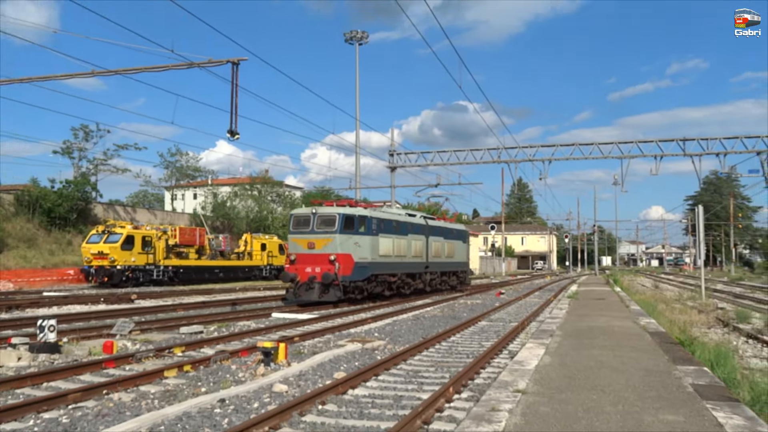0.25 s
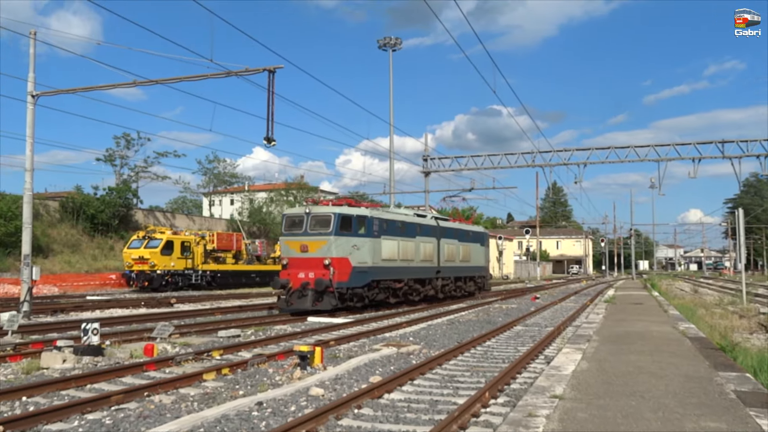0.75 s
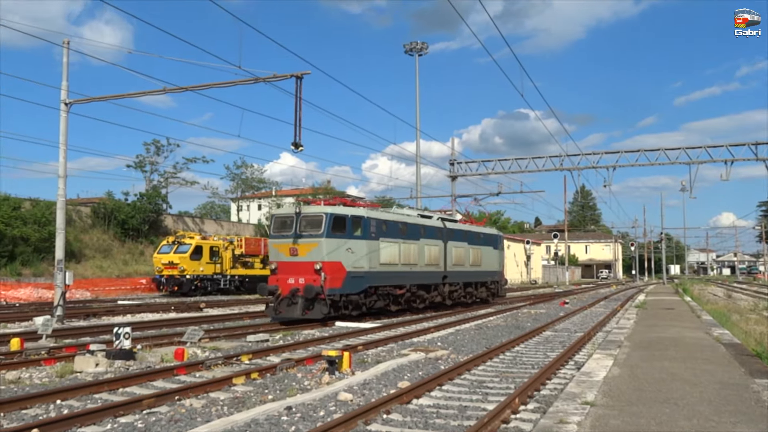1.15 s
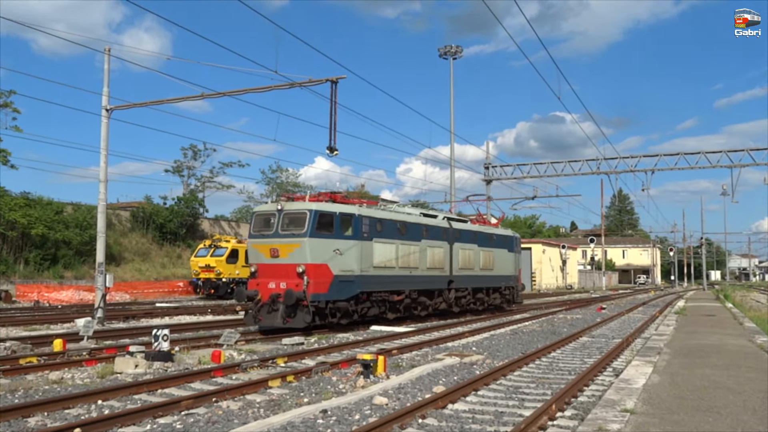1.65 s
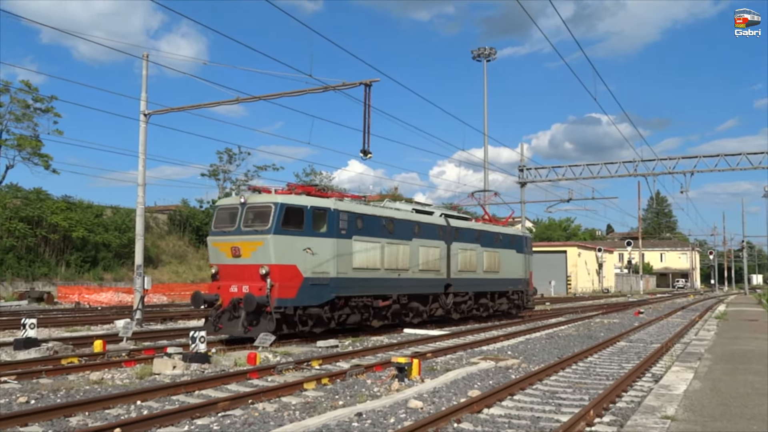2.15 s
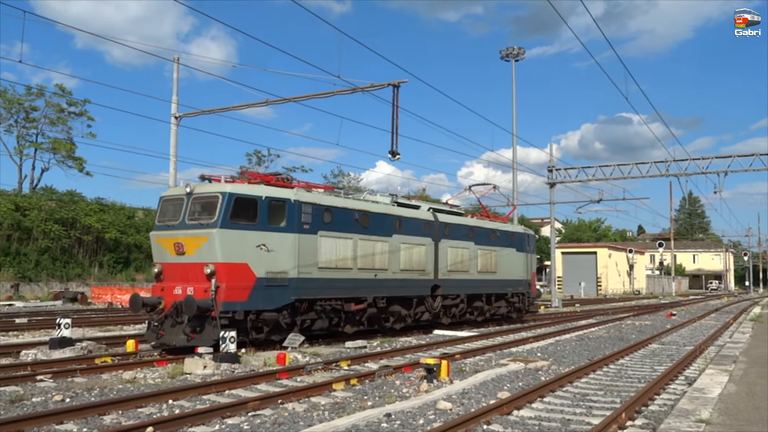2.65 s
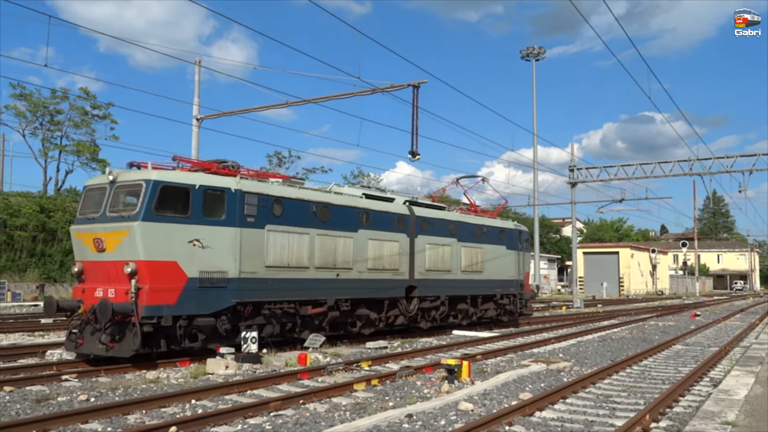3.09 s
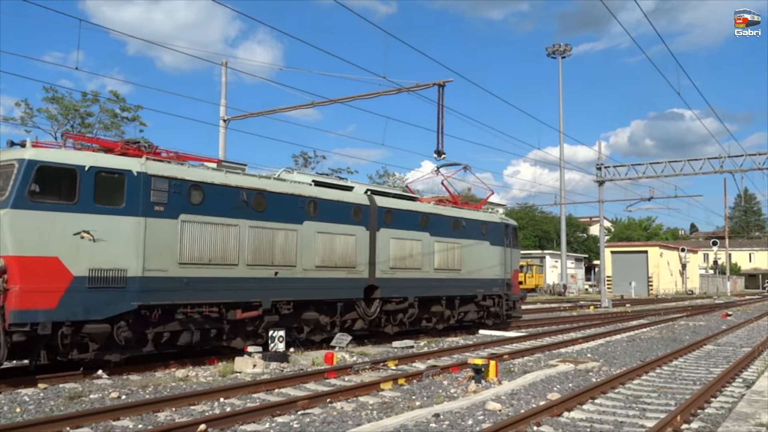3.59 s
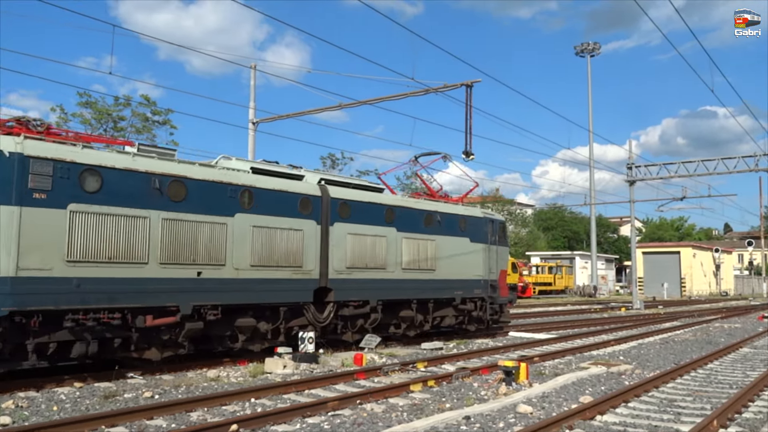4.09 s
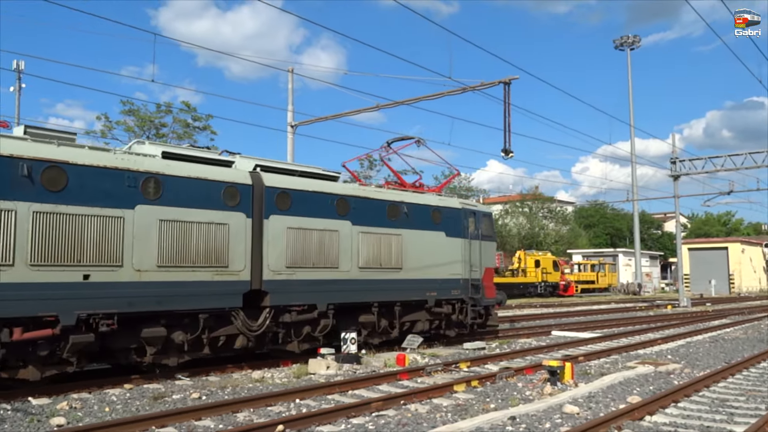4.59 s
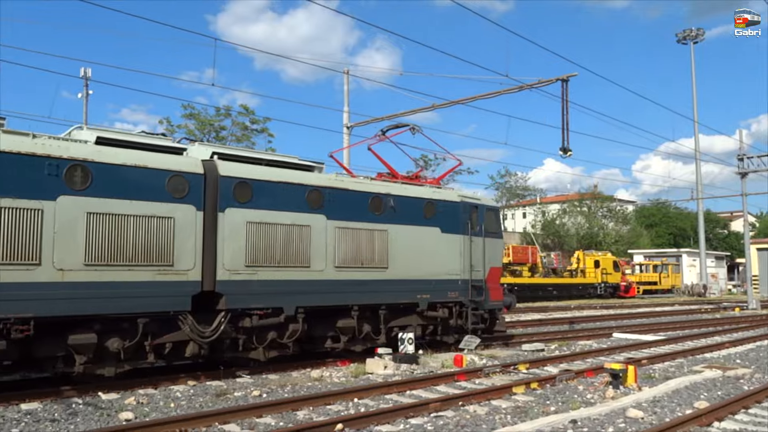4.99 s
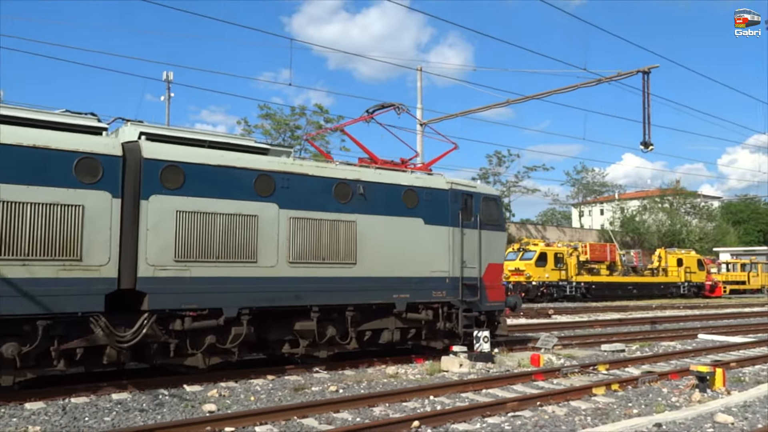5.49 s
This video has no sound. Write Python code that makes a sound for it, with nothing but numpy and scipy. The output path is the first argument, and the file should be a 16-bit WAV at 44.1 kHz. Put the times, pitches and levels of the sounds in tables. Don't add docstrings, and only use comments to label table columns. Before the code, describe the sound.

A harsh steel grind is present from the first instant as a slow electric locomotive rolls across yard points. Wheel flanges scrape the rails with dense bright hiss, and several high ringing notes waver and swell unevenly inside it, like a rough, unsteady squeal. Around 0.5-0.7 s the contact slips and the grind dips briefly, then returns. Near 1.1-1.2 s sharp cracks jump out. A midrange rolling roar grows, fullest at about 1.9-3.2 s, with dull rail-joint knocks clustered from 2.1 to 3.2 s and a lower whining rim note. From 3.2 s the trailing wheels take over: more sizzle, gritty squeaks and passing squeals. Around 4.0-4.4 s the grind drops suddenly and comes back with rapid crackling snaps. Squealing and scraping continue, uneven, to the cut at about 5.7 s. Outdoors, close and dry; a small platform camera microphone, thin in bass, slightly left.

```python
import sys
import numpy as np
from scipy import signal
from scipy.fft import rfft, irfft, next_fast_len
from scipy.io import wavfile
from scipy.ndimage import uniform_filter1d, minimum_filter1d, map_coordinates

SR = 44100
rng = np.random.default_rng(int(sys.argv[2]) if len(sys.argv) > 2 else 0)


def inscribe(sig):
    pcm = np.round(np.clip(np.atleast_2d(sig).T, -1, 1) * 32767)
    wavfile.write(sys.argv[1], SR, pcm.astype(np.int16))


def elevation(decibels):
    levels = np.asarray(decibels, float)
    return 10 ** (levels / 20)


N = 253134

# time_s, pressure_db, bite_db
FLANGE_GRIND = [(0, -23.5, -2.5), (.3, -24.5, -2), (.55, -23, -2), (.9, -21.5, -1.5), (1.9, -21.5, -0.5),
                (3.07, -21, 0), (3.2, -22, -2), (3.5, -22.5, -1.5), (3.75, -20, -9), (3.96, -19, -11.5),
                (4.1, -19.5, -3.5), (4.3, -19.5, -3), (4.52, -19, -7), (4.9, -20, -0.5), (5.05, -21, -3),
                (5.4, -22.5, -4), (5.55, -19, -7), (5.74, -19, -5)]
# centre_s, length_s, level_db
CONTACT_SLIPS = [(.5, 0.024, -2), (1.445, 0.0099, -0.5), (3.392, 0.019, -3), (3.61, 0.011, -1.5),
                 (4.048, 0.0063, -6), (5.47, 0.028, -2.5), (4.117, .008, -1), (4.272, 0.0033, -11),
                 (4.405, 0.0026, -1), (4.487, .004, -0.5), (4.647, 0.0038, -4)]
# start_s, end_s, drop_db, recovery_s
POINT_GAPS = [
    (0.548, 0.682, -4, 0.03),
    (.575, .692, -2.5, .006),
    (4.039, 4.135, -9, 0.0074),
    (4.116, 4.195, -5, 0.073),
]
# time_s, rear_share (0-1)
HANDOVER_TO_REAR = [
    (0, 0),
    (3.05, 0.28),
    (3.25, 0.84),
    (5.74, 0.79),
]
# pitch_hz, level_db (per Hz)
SCRAPE_COLOUR = [(1300, -60), (1600, -8.5), (2010, 0.5), (3300, -5), (4030, -5), (5000, -7), (6510, -1.5),
                 (7610, -1), (8480, -3.5), (10000, -10.5), (13400, -16.5), (15600, -23)]
ZONE_EDGES_HZ = [1650, 3050, 5300, 9300, 16500]
# level_db (over pressure), bite_share, gap_share, flutter_db
GRIND_ZONES = [
    (-5.5, 1, 1.2, 2),
    (-3.5, 0.64, 1.27, 0),
    (-0.93, .01, 1.24, 1.5),
    (-14, 0.17, 1.12, 2),
]
# pitch_hz, width_hz, level_db
FRONT_MODES = [(1952, 40, -7.5), (2320, 50, -8.5), (2537, 20, -2.5), (2706, 100, -10), (5880, 260, -5),
               (6460, 230, -4), (7900, 200, -9.5), (7790, 150, -7), (8430, 140, -5), (9800, 220, -17),
               (10450, 220, -11), (11300, 160, -15), (11900, 300, -26), (12900, 210, -26)]
# pitch_hz, width_hz, depth (0-1)
FRONT_NULLS = [(1586, 360, 0.95), (3030, 150, 0.87), (3660, 210, 0.83), (4490, 290, 0.85), (6120, 215, 0.9),
               (7500, 94, 0), (8710, 300, 0.47), (10000, 250, 0.56), (11900, 200, 0.3), (12200, 250, 0.1),
               (13400, 250, 0.4)]
# pitch_hz, width_hz, level_db
REAR_MODES = [(1828, 62, -4.5), (2400, 83, -5.5), (6440, 110, -2.5), (7110, 150, -1), (8640, 83, -4.5),
              (8150, 350, -5), (10600, 150, -7.5), (11300, 150, -20), (11900, 150, -13), (13150, 200, -17)]
# pitch_hz, width_hz, depth (0-1)
REAR_GAPS = [(3205, 440, 0.81), (3670, 230, 0.65), (4830, 62, 0.6), (10560, 360, 0.6)]
# pitch_hz, width_hz, level_db
WHEEL_NOTES = [
    (3273, 78.1, 0.5),
    (4012, 124, 1),
    (4760, 110.2, -2),
]
# level_db (over pressure), bite_share, gap_share
NOTES_AT_REST = [
    (-12, 0.58, 0.35),
    (-16.5, 0.8, 1),
    (-16.5, .5, 0.67),
]
# centre_s, length_s, level_db
LOW_SWELLS = [(0.047, 0.044, 12), (0.282, 0.056, 9), (.4, 0.044, 4), (0.497, 0.1, 7.5), (.575, 0.018, 3.5),
              (.6, .012, 3), (.63, 0.012, -5), (.68, .012, 4), (0.895, 0.14, 6), (1.039, 0.037, 9),
              (1.525, 0.059, 6), (1.85, 0.086, 3.5), (2.082, .05, 5), (2.25, 0.051, 10),
              (2.602, 0.024, 12.5), (2.7, .03, 1), (2.77, 0.045, 7.5), (2.99, 0.06, 10.5), (3.244, .06, -8),
              (3.36, 0.029, 6), (3.6, 0.043, 0), (3.762, 0.038, 10.5), (3.87, 0.065, 11.5),
              (3.998, 0.03, 11.5), (4.062, .015, 3), (4.1, 0.037, 5.5), (4.14, .012, 1), (4.4, 0.029, 8),
              (4.62, 0.24, -7), (4.82, .025, 6), (4.97, .04, 5), (5.167, 0.08, 6), (5.29, .02, 5),
              (5.42, 0.082, 11), (5.62, .08, -2)]
MIDDLE_SWELLS = [(.1, 0.051, 8.7), (.34, 0.22, 8.5), (4.92, .015, 5), (1.0, .03, 6.1), (1.13, .05, 11),
                 (1.22, 0.063, 9.6), (1.36, .06, 11.5), (1.7, 0.082, 5.4), (2.21, 0.037, 5),
                 (2.57, 0.043, 4.7), (2.87, 0.048, 4.6), (3.06, .046, 4), (3.66, .03, 5), (3.99, 0.11, 7.3),
                 (4.27, 0.041, 7), (4.68, .03, 7), (4.77, .03, 5), (4.85, 0.053, 7.4), (5.0, .04, 6.6),
                 (5.17, 0.06, 7.7), (5.38, 0.15, 9.1), (5.7, .03, 4)]
HIGH_SWELLS = [(.1, 0.061, 8.3), (.46, 0.04, 17), (1.11, 0.12, 8.2), (1.93, .1, 5.4), (2.67, .1, 4.6),
               (3.09, .08, 4.8), (5.18, 0.065, 5), (5.55, 0.047, 9.4), (5.7, .04, 6)]
# centre_s, length_s, level_db
RIM_NOTE_SWELLS = [(1.28, .05, 11), (1.42, .05, 8), (1.7, .08, 10), (1.98, .03, 13), (2.07, .03, 14),
                   (2.17, .04, 11), (2.4, .08, 9), (2.55, .06, 10), (2.75, 0.083, 12), (2.87, .04, 13),
                   (3.3, .04, 14), (4.33, .03, 10), (4.5, .05, 7), (4.9, .05, 9), (5.31, .02, 11)]
# time_s, level_db
ROLLING_LEVEL = [(0, -41), (.35, -42), (.68, -40.5), (.73, -37.5), (1.6, -36.5), (1.9, -33.5), (2.45, -32),
                 (2.65, -31.5), (3.15, -32.5), (3.27, -37), (4.25, -36), (4.4, -41.5), (4.95, -37.5),
                 (5.1, -39.5), (5.74, -39)]
# pitch_hz, level_db (per Hz)
RAIL_COLOUR = [(12, -69), (20, -40), (86, -20), (135, -26), (241, -7), (399, -10), (464, -14), (500, -7.5),
               (570, -11.5), (687, 2.5), (798, 5), (1040, -4), (1250, 3), (1510, -4.5), (1750, 2),
               (2280, -33), (3850, -120)]
ROLLING_EDGES_HZ = [1650, 600, 150, 10]
# level_db (over rolling level), swing_share, rough_share, dipped_share
ROLLING_ZONES = [
    (-0.88, 0.91, 0.51, 0.074),
    (-12, 0.87, 0.15, 0.67),
    (-31.5, 0.64, .1, 0.16),
]
# centre_s, length_s, level_db
ROUGH_STRETCHES = [(0.74, 0.039, 13), (1.1, 0.05, 5), (1.73, 0.026, 7), (1.94, 0.055, 11),
                   (2.38, 0.13, 7.5), (2.72, 0.026, 6.5), (2.92, 0.069, 10.5), (3.18, 0.042, 8),
                   (3.89, 0.019, 1), (4.09, .05, -2), (4.24, 0.08, 2.5), (4.81, 0.15, 7), (5.73, 0.029, 3)]
# centre_s, length_s, level_db
DIPPED_STRETCHES = [(0.17, 0.091, 8), (0.62, 0.097, 9.5), (1.14, 0.091, 6), (2.15, 0.059, 2),
                    (2.4, 0.094, 6.5), (2.54, 0.034, 3), (2.71, 0.039, 9.5), (2.89, 0.042, 7),
                    (3.91, 0.041, 8.0), (4.07, 0.24, 10), (4.84, 0.082, 7.5), (5.2, 0.02, 8),
                    (5.36, 0.14, 8.5)]
# centre_s, pitch_hz, length_s, level_db
BRIEF_PINGS = [(0.033, 3990, 0.022, -26), (0.152, 5660, 0.013, -25), (0.273, 3220, 0.026, -27),
               (0.55, 6570, 0.012, -26), (0.894, 5480, 0.015, -31), (1.054, 2730, 0.012, -30),
               (1.28, 7900, 0.03, -25), (1.416, 7380, 0.012, -23), (1.849, 6630, 0.015, -27),
               (1.958, 2270, 0.01, -29), (2.024, 2560, 0.016, -23), (2.073, 1930, 0.022, -24),
               (2.109, 7380, 0.028, -31), (2.154, 2960, 0.012, -27), (2.422, 8810, 0.013, -30),
               (2.492, 2270, 0.019, -27), (2.663, 5080, 0.016, -29), (2.741, 7730, 0.03, -25),
               (2.79, 1980, 0.017, -26), (3.143, 8350, 0.015, -30), (3.175, 9330, 0.012, -34),
               (3.175, 2550, 0.015, -28), (3.213, 8240, 0.015, -29), (3.262, 8410, 0.012, -28),
               (3.274, 5540, 0.012, -29), (3.288, 1920, 0.013, -28), (3.325, 4450, 0.013, -29),
               (3.43, 7030, 0.012, -26), (3.487, 8810, 0.01, -23), (3.69, 3270, 0.02, -29),
               (3.811, 8300, 0.012, -23), (3.83, 6570, 0.013, -20), (3.911, 8000, 0.013, -26),
               (3.913, 7210, 0.012, -25), (4.188, 7840, 0.012, -28), (4.544, 1920, 0.016, -31),
               (4.547, 7030, 0.013, -26), (4.925, 3880, 0.012, -25), (4.986, 7840, 0.023, -25),
               (5.042, 5250, 0.012, -29), (5.132, 4160, 0.012, -27), (5.148, 6460, 0.016, -27),
               (5.177, 3760, 0.013, -27), (5.281, 6520, 0.028, -26), (5.341, 4220, 0.012, -31),
               (5.462, 6520, 0.012, -29), (5.538, 4220, 0.012, -26), (5.706, 3250, 0.023, -28)]
# start_s, peak_db, fade_s (to -60 dB), pitch_hz
BITE_CRACKS = [(.4924, -15, .004, 5000), (1.135, -8, .008, 4000), (1.201, 9, 0.0072, 4000),
               (4.126, -4, 0.0092, 8000), (4.143, -8, .004, 8000), (4.154, 1, .005, 5500),
               (4.195, -3, 0.008, 7500), (4.217, -4, 0.012, 9000), (4.274, -14, .01, 7500),
               (4.32, -8, .012, 10000), (4.364, -12, .006, 7900)]
# start_s, peak_db, pitch_hz
RAIL_JOINTS = [(0.601, -34, 296), (1.141, -31.5, 399), (2.149, -26, 410), (2.36, -20, 1654),
               (2.698, -27, 735), (2.898, -21, 975), (2.905, -36, 1230), (3.174, -17, 1282),
               (3.875, -23.5, 740), (4.059, -27.5, 316), (4.24, -21.5, 762)]
# centre_s, pitch_hz, width_hz, length_s, level_db
PASSING_SQUEALS = [(3.512, 1910, 86, 0.036, -24.5), (1.44, 6680, 259.2, 0.092, -22.5),
                   (1.82, 5400, 79.92, .12, -27), (2.03, 2002, 31, 0.1, -27.5), (2.497, 1950, 65, 0.1, -31),
                   (3.14, 1878, 44.28, 0.1, -27.5), (3.425, 2050, 81, 0.036, -26.5),
                   (2.516, 768, 86.4, 0.078, -32.5), (4.86, 4755, 36, .16, -22.5),
                   (3.282, 5290, 55.56, .025, -29), (3.165, 10600, 80, .03, -31),
                   (3.28, 6930, 160, 0.11, -25), (3.55, 7150, 200, 0.1, -24),
                   (3.486, 8300, 280.8, .08, -20.5), (3.882, 6630, 108, .12, -24),
                   (4.022, 7960, 670, 0.019, -9), (4.135, 8650, 360, 0.0077, -20),
                   (4.225, 5780, 453.7, 0.015, -20), (4.252, 4000, 28.08, 0.022, -20.5),
                   (4.287, 8140, 750, 0.0063, -12), (4.505, 2410, 52, 0.011, -17),
                   (5.1, 7800, 50, 0.17, -31.5), (5.3, 9800, 130, 0.3, -31), (5.64, 7090, 460, 0.16, -25)]
# pitch_hz, in_step (signed share, -1 to 1),
# in_quadrature (signed share, -1 to 1), unlike_db
SIDE_EARLY = [(30, 0, 0, -20), (55, .01, -.01, -40), (100, 0, -.01, -34), (160, .01, -.04, -21),
              (300, .03, -.09, -20), (600, .05, -.17, -23), (1300, .22, -.13, -15), (1900, .3, -.1, -17),
              (2500, 0, -.04, -20), (3500, .1, -.08, -14), (4200, .03, -.03, -20), (5250, .18, -.07, -17),
              (6200, .01, -.01, -22), (8500, .02, 0, -22), (9900, .02, .04, -10), (11300, .03, 0, -18),
              (12500, 0, 0, -40)]
SIDE_LATE = [(30, 0, 0, -20), (55, .01, -.01, -40), (100, 0, -.01, -34), (160, .01, -.04, -21),
             (600, .04, -.16, -22), (1200, .12, -.15, -17), (1750, .38, -.11, -14), (2300, .18, -.05, -14),
             (3500, .15, -.1, -13), (4000, .08, -.03, -20), (6700, .14, -.02, -19), (7800, .05, .01, -23),
             (9300, .08, .08, -15), (10500, .45, .08, -9), (11500, .35, -.02, -9), (12400, .14, -.02, -9),
             (14500, .03, 0, -16)]


def unit(x):
    return x / np.sqrt(np.mean(x ** 2) + 1e-20)


def along(points, hz):
    f, value = np.transpose(points)
    return np.interp(np.log(hz + 1), np.log(f + 1), value)


def curves(rows):
    time_s, *columns = np.transpose(rows)
    return [np.interp(np.arange(N) / SR, time_s, column) for column in columns]


def wobble(rate):
    knots = rng.standard_normal(int(N * rate / SR) + 4)
    return map_coordinates(knots, [np.arange(N) * rate / SR])


def filtered(x, response):
    m = next_fast_len(N + 8192)
    gain = response(np.arange(0, SR / 2 + 5, 5))
    nearest = np.round(np.fft.rfftfreq(m, 5 / SR)).astype(int)
    return irfft(rfft(x, m) * gain[..., nearest], m)[..., :N]


def mode(f, hz, width):
    return 1j * f * width / (hz * hz - f * f + 1j * f * width + 1e-9)


def band(f, lo, hi):
    return 1 / np.sqrt((1 + (lo / (f + 1)) ** 40) * (1 + (f / hi) ** 40))


def rubbing(patchy_db, streaky_db):
    z = signal.stft(rng.standard_normal((2, N + 512)), nperseg=512)[2]

    def field(bins, hops):
        rough = uniform_filter1d(rng.standard_normal(z.shape[1:]), bins, axis=0)
        return unit(uniform_filter1d(rough, hops, axis=1))

    gain = elevation(patchy_db * field(8, 5) + streaky_db * field(2, 14))
    return signal.istft(z * gain, nperseg=512)[1][:, :N]


def bump(s, length):
    bell = np.zeros(N)
    first, last = int((s - 4 * length) * SR), int((s + 4 * length) * SR)
    near = np.arange(max(first, 0), min(last, N))
    bell[near] = np.exp(-((near / SR - s) / length) ** 2)
    return bell


def swells(rows):
    return sum(db * bump(s, length) for s, length, db in rows)


def load(over_db, bite_share, gap_share):
    t = np.arange(N) / SR
    pressure_db, bite_db = curves(FLANGE_GRIND)
    gaps_db = 0
    for start, end, db, recovery in POINT_GAPS:
        unloading = np.clip((t - start) / 0.04, 0, 1)
        gaps_db = gaps_db + db * unloading * np.exp(-np.maximum(t - end, 0) / recovery)
    return pressure_db + over_db + bite_share * bite_db + gap_share * gaps_db


def rear_share():
    return np.clip(curves(HANDOVER_TO_REAR)[0], 0, 1)


def contact():
    return elevation(swells(CONTACT_SLIPS) + 0.36 * wobble(14) + 0.37 * wobble(90))


def wheels(modes, nulls, lift_db, streaky_db):
    def colour(f):
        peaks = sum(abs(mode(f, hz, width)) ** 2 * elevation(2 * (db + lift_db - along(SCRAPE_COLOUR, hz)))
                    for hz, width, db in modes)
        gaps = np.prod([1 - np.clip(depth, 0, .95) * abs(mode(f, hz, width)) ** 2
                        for hz, width, depth in nulls], axis=0)
        zones = np.array([band(f, lo, hi) for lo, hi in zip(ZONE_EDGES_HZ, ZONE_EDGES_HZ[1:])])
        return (elevation(along(SCRAPE_COLOUR, f)) * np.sqrt(1 + peaks) * gaps * zones)[:, None]

    return [unit(zone) for zone in filtered(rubbing(patchy_db=1.5, streaky_db=streaky_db), colour)]


def flanges():
    share = rear_share()
    front = wheels(FRONT_MODES, FRONT_NULLS, lift_db=9.5, streaky_db=1.5)
    rear = wheels(REAR_MODES, REAR_GAPS, lift_db=4.5, streaky_db=3.5)
    rear[-1] = elevation(1.5) * rear[-1]
    total = 0
    for (db, bite, gap, flutter_db), a, b in zip(GRIND_ZONES, front, rear):
        level_db = load(db, bite, gap) + flutter_db * share * wobble(25)
        total = total + elevation(level_db) * (np.sqrt(1 - share) * a + np.sqrt(share) * b)
    return total


def fed(hz, width):
    b, a = signal.iirpeak(hz, hz / width, SR)
    once = signal.lfilter(b, a, rng.standard_normal((2, N)))
    return unit(signal.lfilter(b, a, once))


def ringing():
    total = 0
    all_swells = [LOW_SWELLS, MIDDLE_SWELLS, HIGH_SWELLS]
    for (hz, width, trim_db), rest, rows in zip(WHEEL_NOTES, NOTES_AT_REST, all_swells):
        level_db = load(*rest) + swells(rows) + trim_db + 1.85 * wobble(60)
        pitch_hz = hz + .35 * width * wobble(60)
        tone = np.sin(2 * np.pi * np.cumsum(pitch_hz) / SR)
        total = total + elevation(level_db) * (0.8 * fed(hz, width) + [[1.1], [0]] * tone)
    return total


def rim():
    level_db = load(-22.5, 0.53, 1) + swells(RIM_NOTE_SWELLS)
    return elevation(level_db) * fed(hz=1950, width=40)


def rolling():
    noise = filtered(rubbing(patchy_db=1.66, streaky_db=2.0), lambda f: elevation(along(RAIL_COLOUR, f)))
    level_db = curves(ROLLING_LEVEL)[0]
    mean_db = level_db.mean()
    rough_db, dipped_db = swells(ROUGH_STRETCHES), swells(DIPPED_STRETCHES)
    roar = 0
    for (db, swing, rough, dip), hi, lo in zip(ROLLING_ZONES, ROLLING_EDGES_HZ, ROLLING_EDGES_HZ[1:]):
        zone_db = mean_db + db + swing * (level_db - mean_db) + rough * rough_db + dip * dipped_db
        zone = unit(filtered(noise, lambda f: band(f, lo, hi)))
        roar = roar + elevation(zone_db + 0.74 * wobble(10)) * zone
    return roar


def flecks(count):
    draw, k = rng.random((count, 3)), np.arange(SR // 50)
    start = (draw[:, 0] * N).astype(int)
    hz = 6000 * (12500 / 6000) ** draw[:, 1]
    uneven_db = -3 * np.log(draw[:, 2] + 0.085) - 11
    level_db = load(0, 0, 1)[start] + along(SCRAPE_COLOUR, hz) + 5 * rear_share()[start] + uneven_db
    tone = np.sin(2 * np.pi * hz[:, None] * k / SR)
    squeak = elevation(level_db)[:, None] * np.hanning(len(k)) * tone
    return np.bincount((start[:, None] + k).ravel(), squeak.ravel(), N + len(k))[:N]


def pings():
    total = np.zeros(N)
    for s, hz, length, db in BRIEF_PINGS:
        t = np.arange(N) / SR - s
        turn, bend = rng.random(2)
        cycles = turn + (hz + 900 * (bend - .5) * t) * t
        total += elevation(db + 1) * bump(s, length) * np.sin(2 * np.pi * cycles)
    return total


def ticks():
    x, t = np.zeros(N + SR), np.arange(SR // 20) / SR
    for s, db, fade_s, hz in BITE_CRACKS:
        sos = signal.butter(2, [hz * .5, hz * 1.45], "band", fs=SR, output="sos")
        crack = signal.sosfilt(sos, rng.standard_normal(len(t)))
        x[round(s * SR):][:len(t)] += elevation(db - 8 - 60 * t / max(fade_s, .001)) * crack
    return x[:N]


def joint_knocks():
    knocks, t = np.zeros(N + SR), np.arange(SR // 5) / SR
    onset = 1 - np.exp(-t / 0.0017)
    for s, db, hz in RAIL_JOINTS:
        knocks[round(s * SR):][:len(t)] += elevation(db - 60 * t / 0.08) * onset * np.sin(2 * np.pi * hz * t)
    return knocks[:N]


def squeals():
    total, t = 0, np.arange(N) / SR
    for s, hz, width, length, db in PASSING_SQUEALS:
        pure = 0.54 * np.exp(-width / 120) * np.sin(2 * np.pi * hz * t)
        total = total + elevation(db) * bump(s, length) * (0.87 * fed(hz, width) + [[1], [0]] * pure)
    return total


def ports(common, unlike):
    def side(table):
        hz, in_step, quadrature, unlike_db = np.transpose(table)

        def mix(f):
            shared = np.interp(f, hz, in_step + 1j * quadrature)
            return np.array([shared, elevation(np.interp(f, hz, unlike_db))])

        return filtered(np.array([common, unlike]), mix).sum(axis=0)

    share = rear_share()
    difference = (1 - share) * elevation(-1.0) * side(SIDE_EARLY) + share * elevation(1.0) * side(SIDE_LATE)
    return common + [[1], [-1]] * difference


def scene():
    common, unlike = contact() * (flanges() + ringing() + squeals()) + rim() + rolling()
    common = common + flecks(count=1800) + pings() + ticks() + joint_knocks()
    return ports(common, unlike)


def low_pass(x):
    return signal.sosfilt(signal.butter(12, 15700, fs=SR, output="sos"), x)


def record(dry):
    need = np.minimum(1, 0.56 / (abs(dry).max(axis=0) + 1e-9))
    gain = uniform_filter1d(minimum_filter1d(need, size=200), size=100)
    return low_pass(dry * gain)


dry = scene()
out = record(dry)
inscribe(out)
```